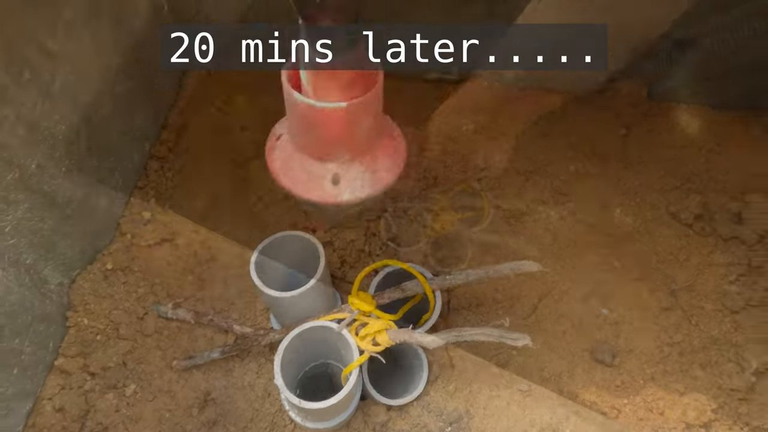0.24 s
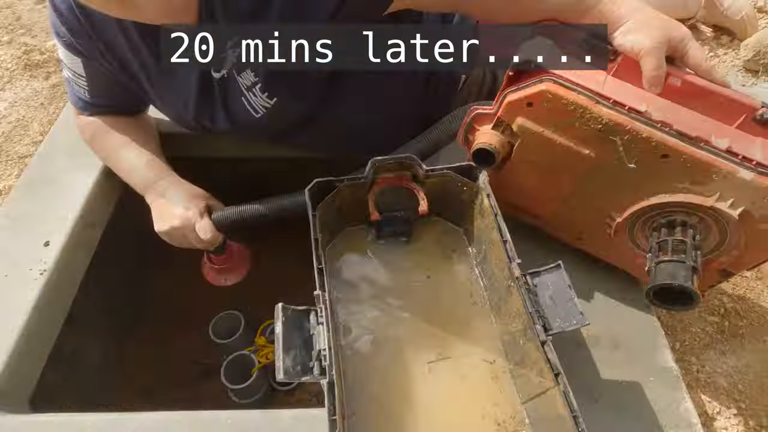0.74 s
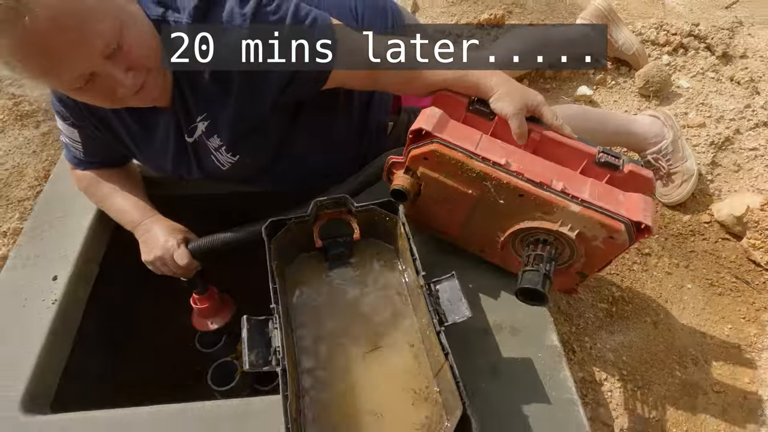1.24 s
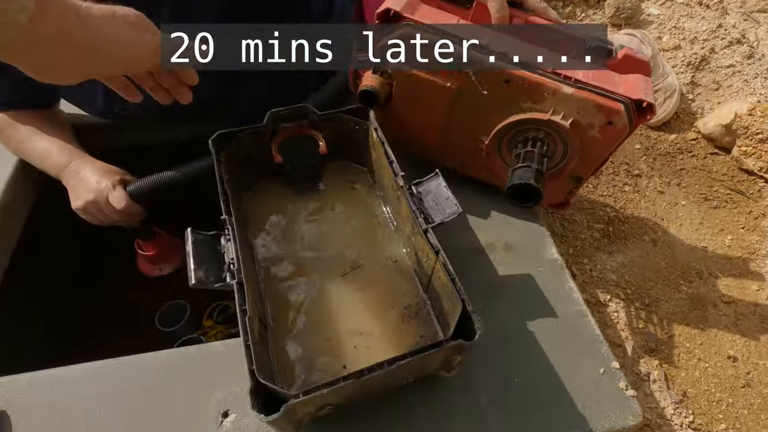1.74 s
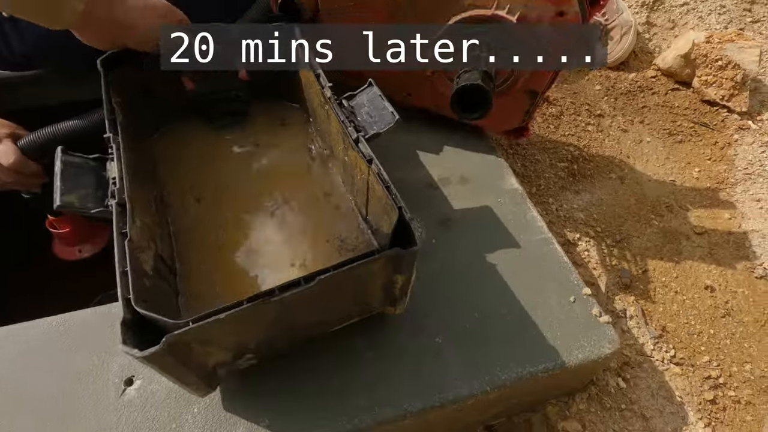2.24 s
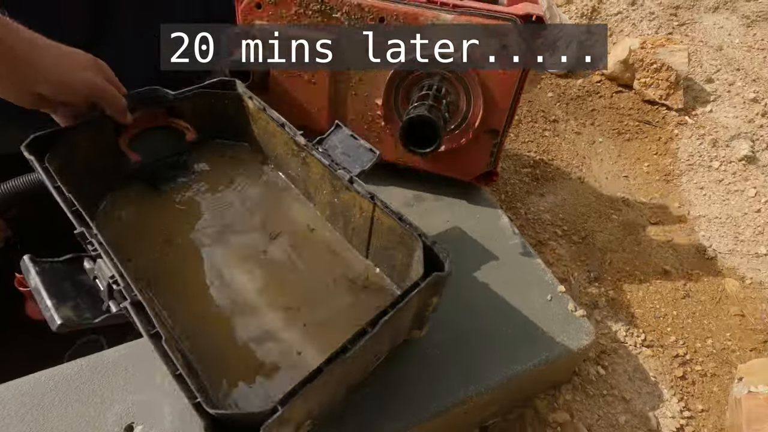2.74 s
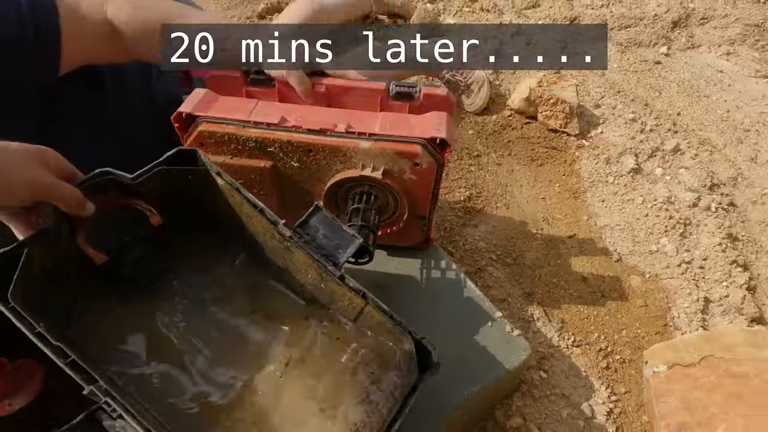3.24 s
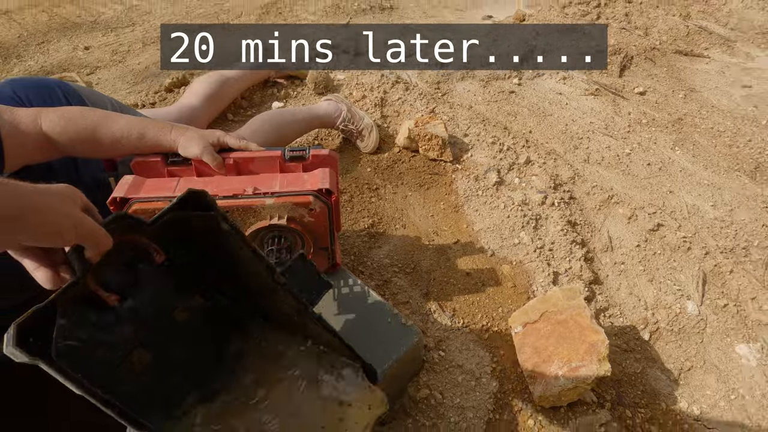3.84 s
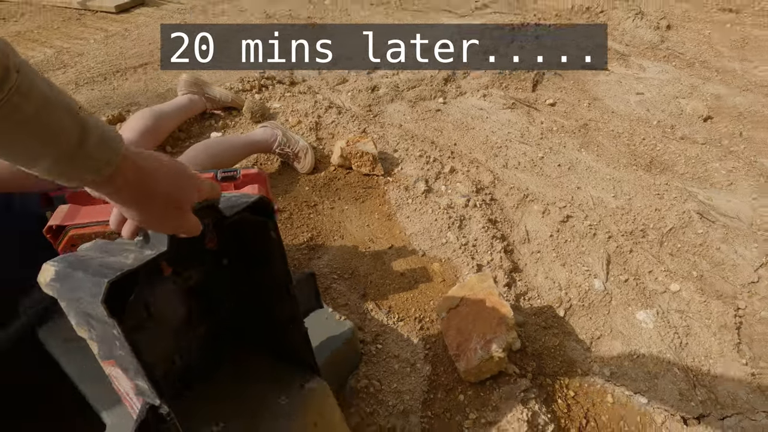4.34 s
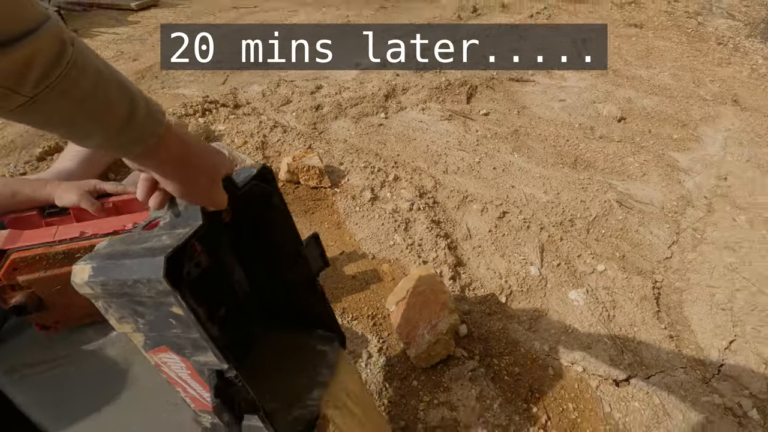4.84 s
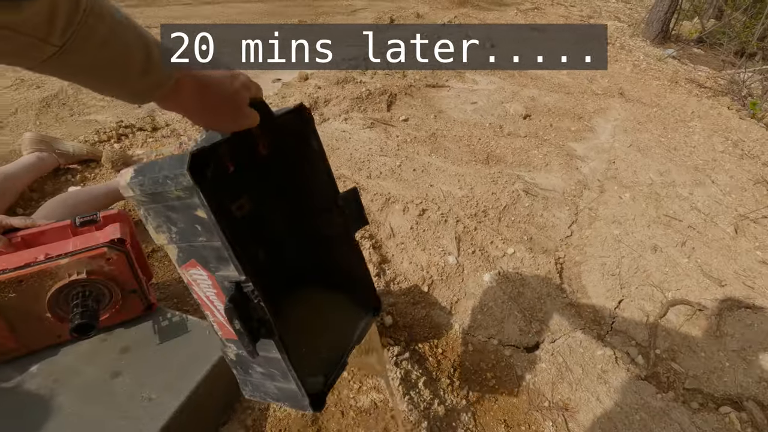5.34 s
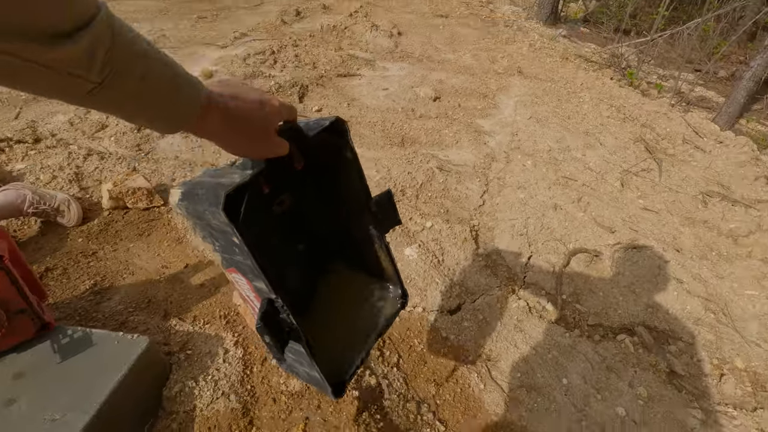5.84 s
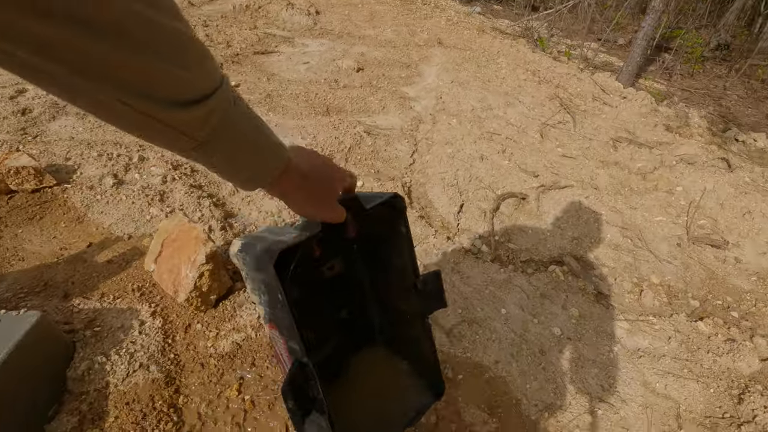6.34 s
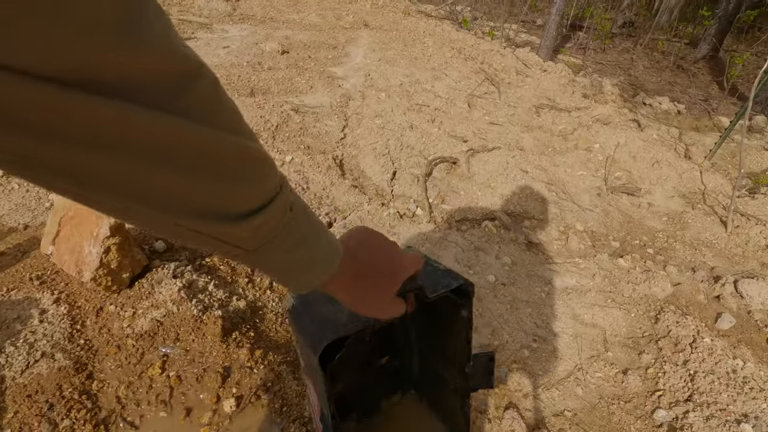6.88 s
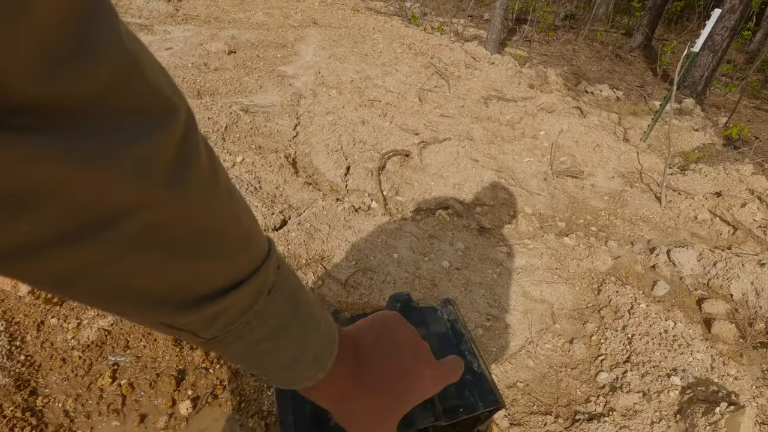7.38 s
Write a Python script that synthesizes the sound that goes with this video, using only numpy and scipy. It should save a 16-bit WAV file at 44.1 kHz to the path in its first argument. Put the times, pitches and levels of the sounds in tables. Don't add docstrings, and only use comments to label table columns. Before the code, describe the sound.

Outdoors, vacuum whine stops dead; hollow plastic thumps and gritty scraping follow, then water pours, thins to drips, and the tank is set down.

```python
import sys
import numpy as np
from scipy import signal
from scipy.fft import rfft, irfft, next_fast_len
from scipy.io import wavfile
from scipy.ndimage import uniform_filter1d

SR = 44100
rng = np.random.default_rng(int(sys.argv[2]) if len(sys.argv) > 2 else 0)


def materialize(psi):
    bounded = np.clip(np.atleast_2d(psi).T, -1, 1)
    quanta = np.round(bounded * 32767).astype(np.int16)
    wavfile.write(sys.argv[1], SR, quanta)


def to_linear_factor(level_db):
    exponent = np.asarray(level_db, float) / 20
    return 10 ** exponent


N = 335601

# t/s, firing cycle f/Hz, level/dB as the microphone rides its gain
ENGINE_IDLE = [
    (1.3, 22.27, -48),
    (2.07, 22.1, -49.5),
    (2.9, 22.17, -47.5),
    (3.09, 21.72, -56),
    (3.33, 22.05, -58),
    (4.63, 22.37, -47.5),
    (5.58, 22.8, -47.5),
    (6.55, 22.5, -49.5),
    (7.46, 22.36, -52.5),
]
# multiple of the cycle, level/dB
EXHAUST_ORDERS = [(1, -37), (2, -21), (3, -17), (4, -14), (5, -9), (6, -17), (7, -17), (8, -3), (9, -4),
                  (10, -2), (11, -9), (12, 0), (13, -6), (14, -9), (15, -16), (16, -10), (17, -16),
                  (18, -19), (19, -15), (20, -14)]
# f/Hz, level/dB per Hz
RUMBLE_SPECTRUM = [(18, -65), (46, -8), (76, -7.5), (253, -0.5), (309, -1.5), (455, -16), (503, -13.5),
                   (600, -6.5), (780, -43), (1320, -120)]
# f/Hz, level/dB per Hz
OUTDOOR_SPECTRUM = [(180, -33), (300, -20), (456, -6), (563, -5), (694, -5.5), (790, -4.5), (1740, -7.5),
                    (1920, -7.5), (2650, -7.5), (7400, -26.5), (9000, -39), (11000, -33), (14200, -60)]
# f/Hz, side minus mid level/dB
STEREO_WIDTH = [(60, -21), (150, -61), (370, -63), (910, -35), (2250, -38), (5550, -31.5), (13700, -8)]

# t/s, level/dB, release/s
HIGH_HISS_SWELLS = [
    (1.33, -75, 1.6),
    (2.17, -78, 1.3),
    (3.46, -84, 0.83),
    (2.75, -52, 0.062),
    (2.83, -71, 0.062),
    (2.94, -71, 0.092),
    (3.05, -59, 0.061),
    (6.03, -60.5, 0.22),
    (6.295, -56, 0.29),
    (6.545, -65, 0.17),
]
# t/s, level/dB
RUSTLE_LEVEL = [(2.12, -71), (2.24, -59), (2.36, -58), (2.44, -73), (2.6, -90), (7.03, -82), (7.05, -57.5),
                (7.09, -69), (7.19, -60), (7.21, -58), (7.35, -58.5), (7.5, -61.5), (7.56, -65),
                (7.61, -68)]

# t/s, f/Hz
MOTOR_SPEED = [
    (0.0, 460),
    (0.25, 452.2),
    (0.512, 447.9),
    (1.28, 443.2),
]
# t/s, level/dB
BLADE_TONE = [
    (0, -55.5),
    (.25, -46.5),
    (.5, -44.5),
    (.9, -49.5),
    (1.15, -41),
    (1.28, -45),
]
# f/Hz, level/dB per Hz
AIR_SPECTRUM = [(24, -80), (40, -46), (207, -22), (383, -35.5), (413, -25), (444, -13), (515, -26.5),
                (1280, -24), (1940, -17.5), (3410, -21.5), (3670, -22.5), (7130, -33), (9120, -43.5),
                (11100, -36), (14200, -59)]
# f/Hz, width/Hz, level/dB
HOUSING_MODES = [(203, 51, 6.5), (1500, 8.2, 12.5), (1960, 440, -12), (6950, 490, 0)]

# t/s, peak level/dB, upper-mode level/dB
LATCH_TAPS = [(1.417, -36, -3.5), (1.496, -18.5, -10), (1.505, -29.5, -15), (1.964, -36, 2),
              (1.968, -28.5, 6), (2.036, -45, 5.5), (2.408, -36, -30), (3.395, -45, -17), (3.467, -41, -20),
              (3.599, -42.5, -6), (4.503, -32.5, -15), (4.714, -23.5, -13), (4.808, -42, 6),
              (5.022, -40, 2), (5.335, -20, -8), (5.926, -27.5, -9.5), (6.109, -44.5, 6),
              (6.281, -41.5, 4.5), (6.541, -22, -17), (7.019, -29, -15), (7.158, -33.5, -33)]
# f/Hz, level/dB, t60/s, build-up/s
LATCH_MODES = [(442, -5.5, 0.042, 0.0093), (543, 5.5, 0.064, 0.042), (733, 4, 0.011, 0.0021),
               (857, 2, 0.054, 0.024), (1080, -7.5, 0.067, 0.014), (1432, 6, 0.035, 0.013),
               (1650, -4, 0.024, 0.0089)]

# t/s, peak level/dB, f/Hz,
# life/s
PANEL_THUDS = [(0.174, -35.5, 130, 0.036), (.195, -42, 131, 0.055), (1.497, -34.5, 1606, 0.021),
               (2.408, -48, 450, 0.031), (1.559, -30.5, 196, 0.021), (1.575, -39, 242, 0.038),
               (2.572, -37, 140.5, 0.04), (2.619, -50, 150, 0.041), (2.66, -44, 131, 0.046),
               (2.69, -42, 327, 0.022), (2.703, -29.5, 222, 0.038), (2.73, -40, 294, 0.036),
               (2.769, -38, 447, 0.033), (2.858, -20.5, 152, 0.034), (2.935, -29, 288, 0.055),
               (2.975, -41, 302, .04), (4.721, -33.5, 540, 0.042), (5.342, -36, 552, 0.039),
               (5.023, -42, 950, 0.012), (7.059, -50, 120, .05), (7.521, -47, 270, 0.044),
               (2.754, -43, 234, .04), (2.772, -23.5, 259, 0.045), (2.821, -28.5, 236, 0.044),
               (2.891, -30, 138, .05), (2.933, -33.5, 153.4, 0.06), (2.96, -42, 141, 0.057),
               (2.986, -45, 135, .04), (3.043, -27, 212, 0.016), (3.045, -40.5, 110, 0.055),
               (3.081, -37.5, 140, 0.05), (6.925, -51, 168, 0.037), (6.937, -37.5, 346, 0.039),
               (6.94, -42, 144, 0.04), (6.962, -41, 270, 0.025), (6.988, -45, 242, 0.042),
               (7.043, -35, 326, 0.032), (7.118, -39.5, 249.7, 0.034), (7.236, -27, 318, 0.048),
               (7.236, -32, 526, 0.02), (7.236, -43.5, 955, 0.042), (7.258, -34.5, 346, 0.082),
               (7.319, -37, 173, 0.036), (7.366, -38, 567, 0.033), (7.366, -35, 283, 0.04),
               (7.396, -40.5, 158, 0.028), (7.405, -41.5, 354, 0.067), (7.448, -43, 292, 0.029)]
# t/s, peak level/dB, strongest wall mode f/Hz, crack level/dB
TANK_BLOWS = [(0.171, -15.5, 480, -34), (0.189, -20, 457, -36), (1.559, -23.5, 387, -46.5),
              (1.576, -42, 1200, -44), (2.565, -21, 142, -46), (2.704, -19, 249, -40.5),
              (2.774, -12.5, 264, -50), (2.817, -18.5, 260, -40), (2.83, -30, 260, -51),
              (2.857, -11.5, 298, -29), (2.886, -17, 1000, -33), (2.937, -17.5, 294, -29.5),
              (2.972, -26, 700, -29), (3.006, -38, 900, -36.5), (3.044, -24, 503, -39),
              (3.081, -36, 132.8, -38.5), (3.094, -20, 160, -61), (5.996, -28, 228, -47.5),
              (6.945, -31, 400, -44.5), (6.963, -35, 280, -46), (7.044, -23, 362, -45),
              (7.117, -30, 253, -44), (7.237, -18.5, 345, -41), (7.255, -22, 345, -45),
              (7.318, -30, 397, -44), (7.334, -31, 172.3, -40), (7.368, -32, 450, -48),
              (7.399, -30, 374, -46)]
# f/Hz, level/dB, t60/s
WALL_MODES = [(137.7, -10, 0.028), (191, -14.5, 0.043), (260, -5.5, 0.052), (358, -7.5, 0.045),
              (485, -15.5, 0.075), (548, -7, 0.042), (618, -12.5, 0.07), (700, -9, 0.041),
              (827, -7.5, 0.042), (1036, -11, 0.05), (1270, -18, 0.039)]
# t/s of most force, wall level/dB, grit level/dB, swell/s, release/s
DRAG_STROKES = [(2.25, -64, -55, 0.14, 0.37), (2.65, -46, -55, 0.41, 0.25), (2.75, -33, -42, 0.089, 0.14),
                (2.86, -38, -50, 0.038, 0.52), (3.07, -53, -62, 0.28, 0.021),
                (3.346, -79, -63, 0.015, 0.026), (3.55, -91, -60.5, 0.22, 0.96),
                (4.05, -47.5, -64, 0.18, 0.029), (7.03, -47.5, -85, 0.26, 0.029),
                (7.19, -56, -55, 0.16, 0.035), (7.245, -44, -50.5, 0.023, 0.18),
                (7.58, -57.5, -64, 0.48, 0.11)]
# start t/s, end t/s
TANK_REST = (3.1, 3.33)
# f/Hz, level/dB per Hz
GRIT_SPECTRUM = [(410, -16), (700, -2), (1030, -2), (1270, -2), (1400, -2.5), (1990, -1), (3690, -9.5),
                 (7010, -29), (8790, -54), (10900, -34), (14200, -68)]
# t/s, level/dB, f/Hz, length/ms
RIM_CREAKS = [(2.02, -62, 2160, 165), (2.235, -60.5, 2670, 65), (2.255, -62, 1050, 45), (2.5, -53, 687, 71),
              (2.569, -46, 693, 18.2), (2.61, -44.5, 695, 22), (2.654, -44, 700, 9),
              (2.721, -37.5, 1270, 27), (2.748, -39.5, 1270, 38), (6.93, -49.5, 560, 52),
              (7.26, -51, 1030, 29), (7.38, -48.5, 560, 33)]
# t/s, peak level/dB
GRIT_TICKS = [(1.503, -37.5), (2.899, -46), (2.907, -43), (2.6944, -38), (2.7426, -42), (2.752, -32),
              (2.758, -33), (2.767, -32), (2.768, -43), (2.811, -44), (2.817, -44), (2.8868, -51),
              (2.9716, -55), (2.8369, -40), (2.917, -36), (2.954, -55), (3.0055, -45), (3.0194, -50),
              (3.035, -41), (3.0502, -51), (3.064, -44), (3.069, -44), (3.08, -37.5), (3.112, -45.5),
              (3.182, -64), (3.258, -53), (3.33, -45), (3.881, -52), (3.982, -50), (3.474, -45),
              (4.059, -37.5), (4.093, -42), (4.136, -40), (4.252, -29), (3.6975, -50), (3.822, -51.5),
              (5.196, -38), (5.245, -44), (5.276, -35), (5.507, -47.5), (6.078, -29.5), (6.541, -29),
              (6.9176, -41.5), (7.2794, -54), (7.45, -50)]

# t/s, level/dB
POUR_LEVEL = [
    (3.99, -42),
    (4.052, -46),
    (4.278, -40),
    (4.414, -32.5),
    (4.57, -37),
    (4.87, -39),
    (5.2, -45.5),
    (5.7, -52),
    (5.99, -61),
]
# t/s, spray level/dB, release/s
SPILL_SURGES = [
    (4.67, -40, 0.15),
    (4.88, -41, 0.43),
    (5.28, -43.5, 0.28),
    (6.073, -53, 0.19),
    (6.315, -48, 0.21),
    (6.593, -48, 0.26),
]
# f/Hz, level/dB per Hz
SPRAY_SPECTRUM = [(530, -20), (900, -23), (1100, -9.5), (1620, -10), (2480, 1), (4420, 0.5), (7180, -14),
                  (8940, -33.5), (9700, -26), (10900, -22.5), (12100, -36), (13200, -37), (14200, -53)]
# t/s, peak level/dB, f/Hz, life/s, pitch rise per s as a share
SLOSH_BUBBLES = [(2.243, -58, 1740, 0.021, 2), (3.322, -50, 1233, 0.056, 11), (3.371, -55, 2500, 0.01, 14),
                 (3.41, -60, 1650, .018, 1.75), (3.463, -55, 1696, .018, 1.9),
                 (3.5, -47.5, 1770, 0.03, 2.66), (3.512, -48, 2530, 0.012, 5.5),
                 (3.547, -48, 2290, 0.018, 7.8), (3.572, -48.5, 3680, 0.011, 51),
                 (3.588, -49, 1560, .022, 5.5), (3.608, -48.5, 2987, 0.011, 10), (3.625, -49, 1820, .03, 5),
                 (3.648, -49, 1710, 0.019, 2.3), (3.672, -60, 1690, .05, 12), (3.752, -58, 2820, .019, 2.2),
                 (3.472, -59, 6700, 0.01, 5), (3.481, -58, 3180, 0.013, 5), (3.501, -51, 2920, 0.014, 8),
                 (3.525, -58, 5000, 0.0081, 20), (3.53, -57, 2780, .03, 3.2), (3.596, -55, 2900, 0.015, 5),
                 (3.628, -55, 2580, .015, 3), (3.63, -55, 1450, .015, 3)]
# t/s, peak level/dB, f/Hz
STREAM_PLOPS = [(4.0581, -43, 3580), (4.1217, -38, 2600), (4.251, -32, 2210), (4.269, -27, 2440),
                (4.3076, -28, 2920), (4.315, -30, 3030), (4.321, -33, 3900), (4.35, -30, 2020),
                (4.365, -44, 3200), (4.16, -37, 4200), (4.185, -40, 2170), (4.22, -32, 3300),
                (4.5, -41, 1800), (4.68, -33, 1780), (4.69, -32, 2650), (4.765, -30, 1890),
                (4.394, -31, 2660), (4.421, -28, 3280), (4.487, -32, 4170), (4.517, -22.5, 2780),
                (4.552, -27.5, 3000), (4.5725, -28.5, 2400), (4.6409, -26, 2480), (4.82, -43, 2850),
                (4.9, -43, 3280), (4.972, -31, 2700), (5.04, -42, 3160), (5.112, -28.5, 3880),
                (5.1815, -36, 2340)]
# t/s, peak level/dB, f/Hz
LATE_DRIPS = [(5.476, -45, 3600), (5.549, -39.5, 4040), (5.5935, -35, 2840), (5.6216, -37, 3400),
              (5.653, -39.5, 4770), (5.7015, -41, 4660), (5.7203, -37.5, 4470), (5.763, -26, 3560),
              (5.775, -46, 4160), (5.8024, -39, 2780), (5.8392, -44, 3120), (5.856, -43.5, 3500),
              (5.919, -46, 3840), (5.952, -44.5, 3800), (6.0307, -40.5, 3770), (6.0555, -38, 4734),
              (6.0868, -31, 3620), (6.134, -46, 4530), (6.281, -44, 2780), (6.3039, -43, 4620),
              (6.31, -36.5, 4860), (6.329, -46, 3140), (6.3483, -41, 5160), (6.365, -51, 5515),
              (6.385, -39, 4030), (6.418, -42, 5300), (6.445, -48, 2700), (6.4656, -45, 4960),
              (6.4812, -41.5, 3750), (6.58, -37, 2620), (6.569, -39, 2940), (6.586, -40, 2150),
              (6.598, -38, 2230), (6.6205, -42, 2100), (6.6215, -47, 4400), (6.647, -52, 2550),
              (6.667, -46, 4200), (6.6158, -39, 3550), (6.634, -42, 3175), (6.66, -48, 5540),
              (6.681, -47, 2680), (6.688, -46, 5540), (6.7331, -56, 3637), (6.7589, -43.5, 3800),
              (6.828, -53, 5100), (6.8533, -50.5, 5350), (6.9626, -47.5, 4400), (6.7601, -46, 2130),
              (6.79, -45, 3250), (6.9012, -45.5, 2340), (6.9407, -45, 2470), (7.066, -40.5, 2710),
              (7.103, -47, 2460), (7.107, -45, 2510), (7.256, -42, 2580), (7.255, -43.5, 4680),
              (7.3324, -54, 2300), (7.585, -46.5, 3600)]


def unit(x):
    return x / np.sqrt(np.mean(x ** 2) + 1e-20)


def in_time(rows):
    s, *columns = np.transpose(rows)
    return [np.interp(np.arange(N) / SR, s, c) for c in columns]


def gate(t0, t1, fade_s):
    t = np.arange(N) / SR
    return np.clip(np.minimum(t - t0, t1 - t) / fade_s, 0, 1)


def stroke(s, swell_s, release_s):
    t = np.arange(N) / SR - s
    away = np.where(t < 0, -t / swell_s, t / release_s)
    return to_linear_factor(-20 * away ** 1.19)


def at_hz(points, hz):
    return np.interp(np.log(hz), np.log(np.array(points)[:, 0]), np.array(points)[:, 1])


def colour(x, points):
    size = next_fast_len(N)
    hz = np.arange(size // 2 + 1) * SR / size + 1
    return irfft(rfft(x, size) * to_linear_factor(at_hz(points, hz)), size)[:N]


def filtered(x, order, hz, kind):
    return signal.sosfilt(signal.butter(order, hz, kind, fs=SR, output="sos"), x)


def resonance(x, hz, width_hz):
    return signal.lfilter(*signal.iirpeak(hz, hz / width_hz, fs=SR), x)


def drift(rate):
    r = np.exp(-40 * np.pi * rate / SR)
    slow = signal.lfilter([1], [1, -2 * r, r * r], rng.standard_normal(N // 20 + 4002))[4000:]
    return np.interp(np.arange(N) / 20, np.arange(len(slow)), unit(slow))


def patchy(points, shared_db, own_db, rate):
    white, out, together = rng.standard_normal((2, N)), 0, drift(rate)
    edges = 30 * 2 ** np.arange(0, 9.1, .5)
    for k, (low, high) in enumerate(zip(edges, edges[1:])):
        band = filtered(white[k % 2], 2, [low, high], "band")
        out = out + band * to_linear_factor(shared_db * together + own_db * drift(rate))
    return unit(colour(out, points))


def clicks(times, gains):
    out = np.zeros(N)
    out[(np.asarray(times) * SR).astype(int)] = gains
    return out


def ring(x, hz, t60):
    r, w = to_linear_factor(-60 / (t60 * SR)), 2 * np.pi * hz / SR
    return signal.lfilter([0, np.sin(w)], [1, -2 * r * np.cos(w), r * r], x + 1e-18)


def strike(x, hz, t60, swell_s):
    return ring(x, hz, t60) - ring(x, hz, swell_s)


def burst(times, gains, t60):
    decay = to_linear_factor(-60 / (t60 * SR))
    return signal.lfilter([1], [1, -decay], clicks(times, gains)) * rng.standard_normal(N)


def crack(times, gains, t60, points):
    return colour(burst(times, gains, t60), points) / np.std(colour(rng.standard_normal(N), points))


def add_bubble(out, s, peak_db, hz, life_s, rise):
    start = int(s * SR)
    t = np.arange(min(int(life_s * SR), N - start)) / SR
    swell = 6 * t / life_s * np.exp(1 - 6 * t / life_s)
    out[start:start + len(t)] += to_linear_factor(peak_db) * swell * np.sin(2 * np.pi * hz * np.expm1(rise * t) / rise)


def swarm(count, low_hz, span, cycles, rise, tilt_db):
    out = np.zeros(N)
    for when, size, pitch, life in rng.random((count, 4)):
        hz = low_hz * span ** pitch
        peak_db = tilt_db * pitch - 3.7 * np.log(size + 0.041)
        add_bubble(out, 3.96 + 3.04 * when, peak_db, hz, cycles * (1 + 2 * life) / hz, rise)
    return out / np.std(out[4 * SR:7 * SR])


def engine_and_air():
    cycle_hz, level_db = in_time(ENGINE_IDLE)
    phase = 2 * np.pi * np.cumsum(cycle_hz) / SR
    lines = 0
    for k, db in EXHAUST_ORDERS:
        wander_db = 1.5 * drift(3)
        start = rng.uniform(0, 2 * np.pi)
        lines += to_linear_factor(db + wander_db) * np.sin(k * phase + start + 0.054 * wander_db)
    rumble = patchy(RUMBLE_SPECTRUM, shared_db=.6, own_db=1, rate=5) * (1 + .55 * np.cos(phase))
    hiss = patchy(OUTDOOR_SPECTRUM, shared_db=.5, own_db=.8, rate=9)
    return to_linear_factor(level_db) * (to_linear_factor(-3) * unit(lines) + to_linear_factor(-10) * rumble + to_linear_factor(-9) * hiss)


def high_hiss():
    hiss = filtered(patchy(SPRAY_SPECTRUM, shared_db=4, own_db=.5, rate=37), 4, 7550, "high")
    return unit(hiss) * sum(to_linear_factor(db) * stroke(s, 0.013, release_s) for s, db, release_s in HIGH_HISS_SWELLS)


def rustle():
    noise = patchy(SPRAY_SPECTRUM, shared_db=1, own_db=1, rate=39)
    return to_linear_factor(in_time(RUSTLE_LEVEL)[0]) * gate(2.1, 9, .01) * noise


def vacuum():
    (shaft_hz,), (blade_db,) = in_time(MOTOR_SPEED), in_time(BLADE_TONE)
    phase = 2 * np.pi * np.cumsum(shaft_hz * (1 + 0.0003 * drift(26))) / SR
    tones = to_linear_factor(-28 + 0.56 * drift(63)) * (np.sin(phase) + to_linear_factor(-32) * np.sin(2 * phase))
    tones += to_linear_factor(blade_db + 0.78 * drift(7.3)) * np.sin(8 * phase)
    rush = patchy(AIR_SPECTRUM, shared_db=.5, own_db=1.5, rate=4.6)
    hose_mode_spacing_hz, hose_echo = 323.5, .38
    loop = np.zeros(round(SR / hose_mode_spacing_hz) + 1)
    loop[[0, -1]] = 1, -hose_echo
    rush = unit(signal.lfilter([1], loop, rush))
    body = sum(to_linear_factor(db - 1 + drift(6.1)) * resonance(rush, hz, width_hz) for hz, width_hz, db in HOUSING_MODES)
    vacuum_end_s = 1.2885
    return (np.sqrt(2) * tones + to_linear_factor(-38.5) * (rush + body)) * gate(-1, vacuum_end_s, 0.00018)


def latch():
    s, peak_db, upper_db = np.transpose(LATCH_TAPS)
    modes = 0
    for k, (hz, db, t60, swell_s) in enumerate(LATCH_MODES):
        spread_db = rng.normal(0, 2.5, len(s))
        force = to_linear_factor(peak_db - 5.5 + db + spread_db + upper_db * (hz > 1000))
        modes += (-1) ** k * strike(clicks(s, force), hz, t60, swell_s)
    soft = filtered(modes, 2, [350, 2200], "band")
    return soft + crack(s, to_linear_factor(peak_db - 20), 0.03, GRIT_SPECTRUM)


def thuds():
    out = np.zeros(N)
    for row in PANEL_THUDS:
        add_bubble(out, *row, rise=.01)
    return out


def tank():
    s, peak_db, main_hz, crack_db = np.transpose(TANK_BLOWS)
    slip_force = to_linear_factor(4.3 * np.minimum(rng.exponential(1, N), 4))
    slips = slip_force * rng.choice([-1, 1], N) * (rng.random(N) < 900 / SR)
    blows = walls = 0
    for k, (hz, db, t60) in enumerate(WALL_MODES):
        near_db = -11 * np.abs(np.log2(hz / main_hz))
        force = to_linear_factor(peak_db - 2.5 + db + near_db + rng.normal(0, 2, len(s)))
        contact = clicks(s, force) + burst(s, force * to_linear_factor(-17), 0.044)
        blows += (-1) ** k * strike(contact, hz, t60, swell_s=0.019)
        slide_db = db - 11 * (hz < 170) - 5 * (hz > 580)
        walls += to_linear_factor(slide_db + 4 * drift(5.3)) * ring(slips, hz, t60)
    walls = unit(walls) * (1 - gate(*TANK_REST, .03))
    grit = patchy(GRIT_SPECTRUM, shared_db=1.7, own_db=1.8, rate=90)
    scratch = crack(s, to_linear_factor(crack_db + 2), 0.024, GRIT_SPECTRUM)
    for moment, wall_db, grit_db, swell_s, release_s in DRAG_STROKES:
        moving = stroke(moment, swell_s, release_s)
        blows += to_linear_factor(wall_db) * walls * moving
        scratch += to_linear_factor(grit_db) * grit * moving
    for start, db, hz, ms in RIM_CREAKS:
        rub = resonance(grit, hz, width_hz=42) * gate(start, start + ms / 1000, 0.0043)
        blows += to_linear_factor(db) * unit(rub) * np.sqrt(ms / 1000 * SR / N)
    body = filtered(blows, 3, [125, 5000], "band")
    tick_s, tick_db = np.transpose(GRIT_TICKS)
    ticks = crack(tick_s, to_linear_factor(tick_db - 2.5), 0.036, SPRAY_SPECTRUM)
    return body + scratch + signal.lfilter([1, -.6], [1], ticks)


def stream_gain():
    surges = sum(to_linear_factor(db) * stroke(s, 0.039, release_s) for s, db, release_s in SPILL_SURGES)
    return to_linear_factor(in_time(POUR_LEVEL)[0]) * gate(3.975, 6.1, 0.06) + surges


def drop_crackle():
    hits = to_linear_factor(4.2 * np.minimum(rng.exponential(1, N), 2.6)) * (rng.random(N) < 300 / SR)
    tails = signal.lfilter([1], [1, -.97], hits) * rng.standard_normal(N)
    return unit(signal.lfilter([1, -.6], [1], unit(colour(tails, SPRAY_SPECTRUM))))


def single_drops():
    rows = [(*row, 0.0056, 48, -23) for row in STREAM_PLOPS]      # life/s, rise per s, splash level/dB
    rows += [(*row, -9) for row in SLOSH_BUBBLES]
    rows += [(*row, 0.0064, 36, -3) for row in LATE_DRIPS]
    drops = np.zeros(N)
    for row in rows:
        add_bubble(drops, *row[:5])
    s, peak_db, *_, splash_db = np.transpose(rows)
    return drops + crack(s, to_linear_factor(peak_db + splash_db), 0.017, SPRAY_SPECTRUM)


def water():
    stream = stream_gain()
    thin_db = -35.5 - 20 * np.log10(stream + 1e-6)
    rush_lag_s = 0.047
    smooth_db = uniform_filter1d(thin_db, size=SR // 5)
    late_db = np.interp(np.arange(N) - rush_lag_s * SR, np.arange(N), smooth_db)
    hiss = patchy(SPRAY_SPECTRUM, shared_db=1.4, own_db=1.3, rate=40)
    fine = swarm(count=3600, low_hz=1538, span=3.62, cycles=3.8, rise=55, tilt_db=7)
    deep = swarm(count=3000, low_hz=615, span=3.78, cycles=6.6, rise=12.4, tilt_db=22.5)
    crackle_db = np.minimum(-17 + 1.27 * thin_db, -4)
    crackle = to_linear_factor(crackle_db) * drop_crackle() * gate(4.03, 9, 0.024)
    flow = stream * (to_linear_factor(-4) * hiss + to_linear_factor(-8.5) * fine + crackle)
    flow += to_linear_factor(-41.5 - 3 * late_db) * deep
    return flow + single_drops()


def scene():
    mid = engine_and_air() + high_hiss() + rustle() + vacuum() + latch() + thuds() + tank() + water()
    side = to_linear_factor(1) * colour(mid, STEREO_WIDTH) * drift(190)
    return np.array([mid + side, mid - side])


def low_pass(x):
    return signal.sosfilt(signal.butter(12, 14340, fs=SR, output="sos"), x)


def record(dry):
    mix = filtered(dry, 2, 45, "high")
    mix = signal.lfilter(*signal.iirnotch(9100, 14, fs=SR), mix)
    return low_pass(mix)


dry = scene()
out = record(dry)
materialize(out)
```